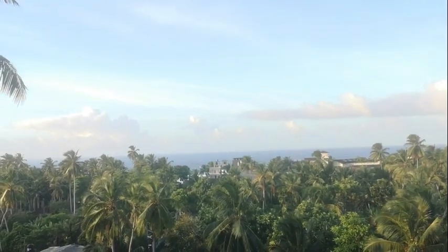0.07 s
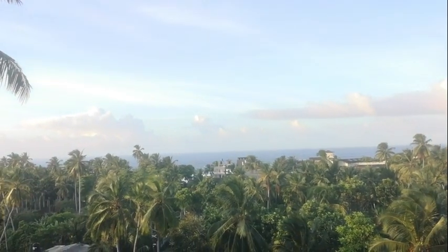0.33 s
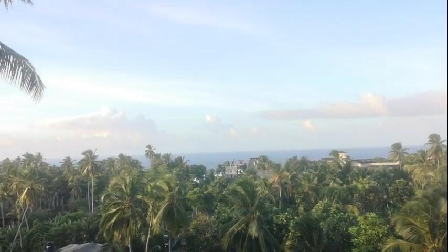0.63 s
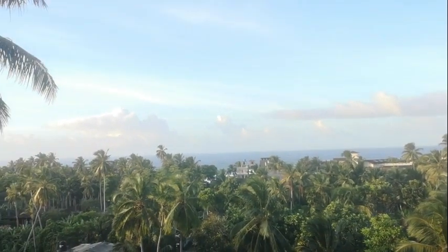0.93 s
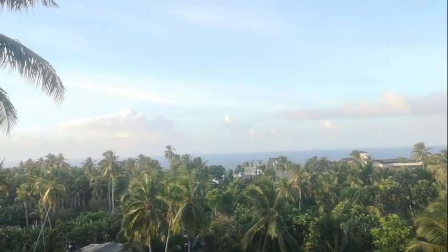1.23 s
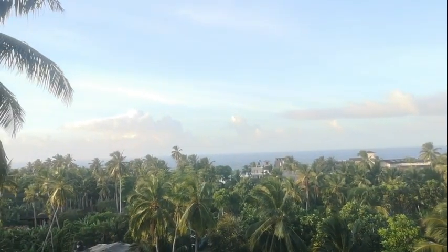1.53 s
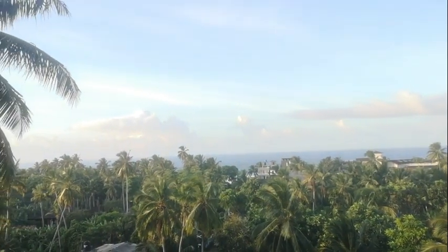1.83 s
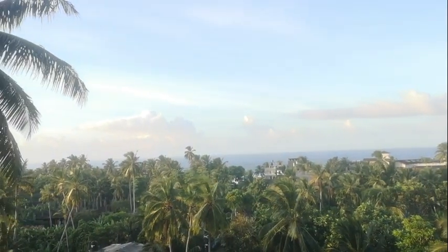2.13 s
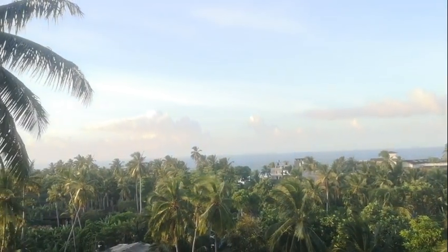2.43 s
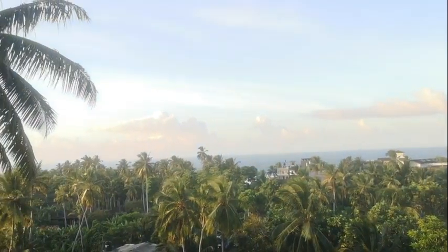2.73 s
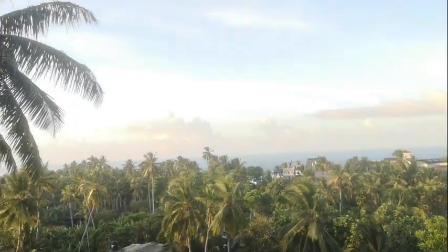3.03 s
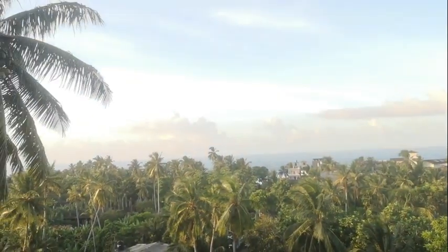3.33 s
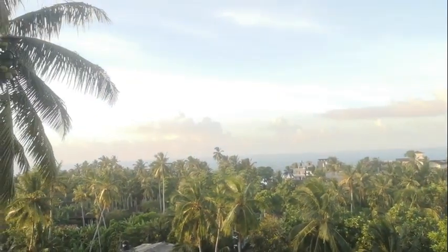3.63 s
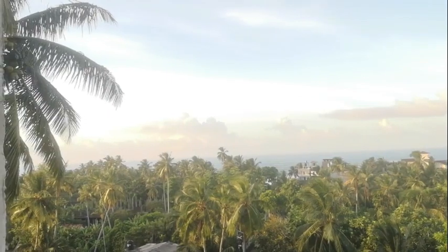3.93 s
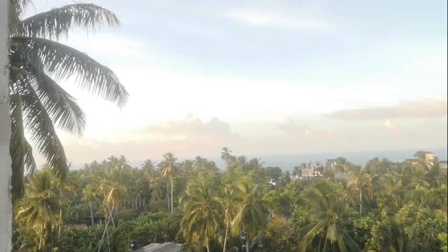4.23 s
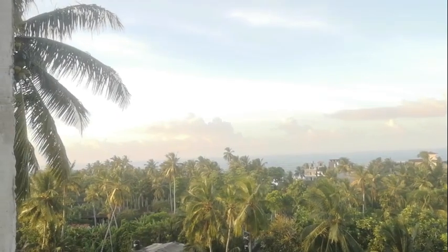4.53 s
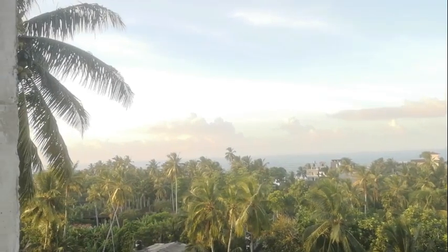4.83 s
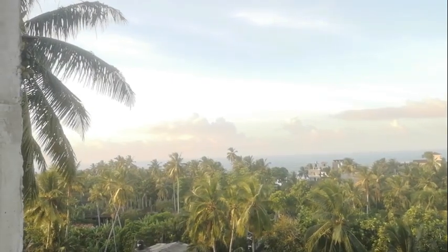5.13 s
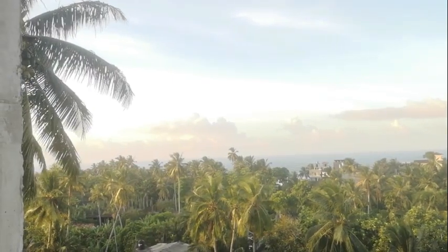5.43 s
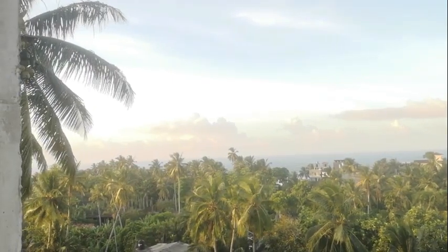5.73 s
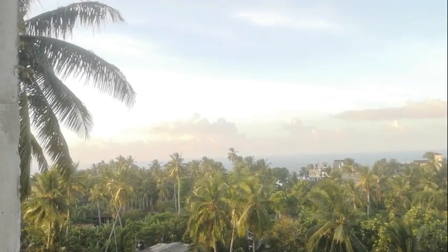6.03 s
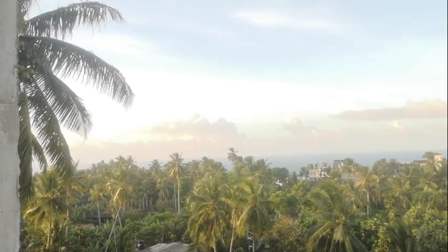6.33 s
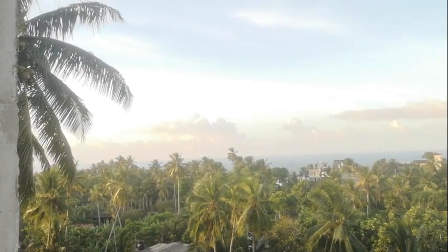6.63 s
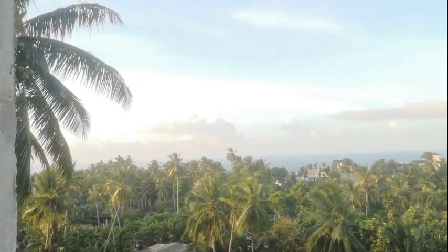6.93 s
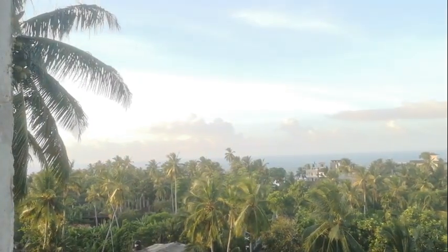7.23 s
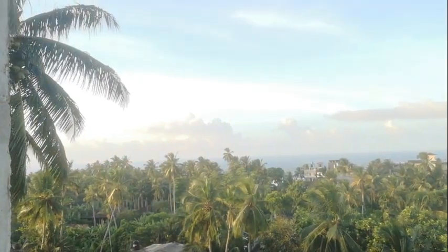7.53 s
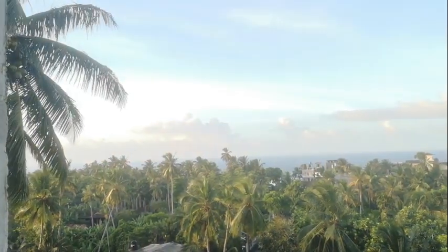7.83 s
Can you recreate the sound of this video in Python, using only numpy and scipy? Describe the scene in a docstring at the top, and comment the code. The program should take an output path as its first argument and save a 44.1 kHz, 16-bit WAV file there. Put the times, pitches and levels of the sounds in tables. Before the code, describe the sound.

Low, gusty wind rumbles on the microphone in a palm grove, over a soft hiss, faint swishing fronds and the hum of a far engine. A small bird starts chipping quietly and steadily on the right. About halfway through, a louder bird gives five raspy falling whistles, then two lower notes that each end in a trill, all with a short echo from the trees. The gusts return, with faint distant peeps.

```python
"""A palm grove, where a bird, likely a kingfisher, calls: five falling whistles, then two lower notes
that each end in a trill. Scattering by the trees gives each note a tail. A small bird chips steadily
nearer by, others peep and chatter far off, and palm fronds swish as their leaflets rub.
Turbulent gusts buffet the microphone over a low rumble, an even hiss and the hum of a far engine."""
import sys
import numpy as np
from scipy import signal
from scipy.fft import rfft, irfft, next_fast_len
from scipy.io import wavfile

SR = 44100
rng = np.random.default_rng(int(sys.argv[2]) if len(sys.argv) > 2 else 0)


def bounce(signal):
    """Save signal as a 16-bit WAV file at the path given by the first command-line argument."""
    frames = np.transpose(np.atleast_2d(signal))
    limited = np.clip(frames, -1, 1)
    pcm = np.round(limited * 32767).astype(np.int16)
    wavfile.write(sys.argv[1], SR, pcm)


N = 351803
TIME = np.arange(N) / SR
SIZE = next_fast_len(N)
BINS = np.fft.rfftfreq(SIZE, 1 / SR)


def gain_of(db):
    """Amplitude ratio of a level in decibels."""
    return 10 ** (np.asarray(db) / 20)


def unit_rms(x):
    """Normalisation to rms 1."""
    return x / np.sqrt(np.mean(x ** 2) + 1e-20)


def spectrum_at(points, hz):
    """Interpolation of a spectrum on a log-frequency axis."""
    f, value = np.transpose(points)
    return np.interp(np.log(hz + 1), np.log(f + 1), value)


def follow(rows, t):
    """Linear interpolation of each column of a curve at the times t."""
    s, *columns = np.transpose(rows)
    return [np.interp(t, s, c) for c in columns]


def add(mix, s, sound):
    """Superposition of a sound on the mix at s seconds."""
    part = mix[max(round(s * SR), 0):][:len(sound)]
    part += sound[:len(part)]


def wander(hz):
    """Random fluctuation of rms 1: noise low-passed near hz."""
    return unit_rms(irfft(rfft(rng.standard_normal(SIZE)) * np.exp(-(BINS / hz) ** 2), SIZE)[:N])


def noise(db, correlation):
    """Partly coherent stereo noise of rms 1, with the spectral shape db."""
    left, independent = rfft(rng.standard_normal((2, SIZE)))
    correlation = np.clip(correlation, -1, 1)
    right = correlation * left + np.sqrt(1 - correlation ** 2) * independent
    return unit_rms(irfft(np.array([left, right]) * gain_of(db), SIZE)[:, :N])


def steadied(x, samples):
    """Division by the running rms removes chance swells longer than the window."""
    window = np.hanning(samples)
    power = signal.fftconvolve((x ** 2).mean(0), window, "same")
    return x / np.sqrt(power / signal.fftconvolve(np.ones(N), window, "same"))


def resampled(x, pace):
    """Time scaling: all frequencies shift in proportion to the pace."""
    at = np.cumsum(pace) % N
    return np.array([np.interp(at, np.arange(N), channel) for channel in x])


def swells(rows):
    """Incoherent Gaussian swells add in power; rows are (peak time [s], half length [s], level [dB])."""
    return sum(gain_of(2 * db) * np.exp(-((TIME - s) / half) ** 2) for s, half, db in rows)


def shaped(shape, start, length, db, ratio=1):
    """A note's contour, stretched and transposed to (time [s], pitch [Hz], level [dB])."""
    return np.array(shape) * [length, ratio, 1] + [start, 0, db]


def sing(notes, quaver, trill_hz, trill_depth, rasp, octave_db=0):
    """Frequency-modulated glides with a weak octave; noise modulation spreads a power share, rasp."""
    # strength of the second harmonic: (frequency [Hz], relative level [dB])
    octave = [(4000, -26), (5400, -24), (6600, -17.5), (7200, -13), (7600, -9.5), (8000, -8), (8400, -18),
              (9000, -30)]
    rasp_hz, trill_fade = 260, 0.42  # the trill dies out over this last share of a note
    out, jitter = np.zeros(N), wander(480)
    frayed = np.sqrt(1 - rasp) + np.sqrt(rasp / 2) * (wander(rasp_hz) + 1j * wander(rasp_hz))
    for rows in notes:
        t = np.arange(rows[0][0], rows[-1][0] + 0.013, 1 / SR)
        hz, db = follow(rows, t)
        fade = np.minimum(np.linspace(1, 0, len(t)) / trill_fade, 1)
        trill = trill_depth * fade * np.sin(2 * np.pi * trill_hz * t)
        hz = hz * (1 + quaver * np.interp(t, TIME, jitter) + trill)
        phasor = np.exp(2j * np.pi * np.cumsum(hz) / SR)
        overtone = gain_of(octave_db + spectrum_at(octave, 2 * hz)) * phasor ** 2
        tone = (np.interp(t, TIME, frayed) * (phasor + overtone)).imag
        add(out, t[0], np.sqrt(2) * gain_of(db) * tone * signal.windows.tukey(len(t), .12))
    return out


def grove(x, early_s, early_db):
    """Reverberation: trunks and crowns scatter sound into a tail; early_db weights its first echoes."""
    # decay by band: (frequency [Hz], time to fall 60 dB [s])
    decay_times = [(1500, 0.32), (2600, 0.58), (4000, 0.35), (8000, 0.44)]
    reflections = rng.standard_normal((2, SR)) * (rng.random((2, SR)) < .1)
    hz, t, bands = signal.stft(reflections, SR, nperseg=256)
    db = early_db * np.exp(-t / early_s) - 60 * t / spectrum_at(decay_times, hz)[:, None]
    tail = signal.istft(bands * gain_of(db), SR, nperseg=256)[1]
    tail /= np.linalg.norm(tail, axis=1, keepdims=True)
    return signal.fftconvolve(x[None], tail, axes=1)[:, :N]


def air():
    """Diffuse field: far surf and foliage sum to an even hiss, coherent only in the bass."""
    # spectrum of the hiss: (frequency [Hz], relative density [dB])
    spectrum = [(100, 12), (250, 14), (350, 7.5), (480, 2), (800, 2), (1100, 3), (1400, -0.5), (1900, 3),
                (2700, 1.5), (4000, -6.5), (8500, -11.5), (9800, -16.5), (11000, -30.5), (15000, -58)]
    # narrow treble humps: (centre [Hz], half width [Hz], height [dB])
    humps = [(5400, 710, 5), (6570, 340, 8.5), (7500, 480, 4.5), (9230, 560, 12.5)]
    # slow drift: (time [s], relative level [dB])
    drift = [(0, -59), (.55, -57.5), (1.1, -58.5), (1.45, -58), (2.2, -58.5), (3.2, -57.5), (3.9, -57),
             (4.7, -56), (5.7, -57.5), (6.3, -58.5), (6.9, -58), (7.98, -57.5)]
    # balance: (frequency [Hz], left minus right [dB])
    balance = [(60, 4), (110, -6.5), (200, 1.5), (380, -0.5), (700, 0.5), (1290, -1.5), (2380, -2.5),
               (4400, 0.5), (8120, -3), (15000, -32.5)]
    # likeness of the channels: (frequency [Hz], correlation [-1 to 1])
    correlation = [(100, 1), (290, 1), (640, -0.26), (1410, 0.26), (3100, -0.19), (6800, -0.0089)]
    db = spectrum_at(spectrum, BINS)
    db += sum(height * np.exp(-((BINS - hz) / width) ** 2) for hz, width, height in humps)
    db = db + spectrum_at(balance, BINS) * np.array([[.5], [-.5]])
    drift_db, = follow(drift, TIME)
    return noise(db, spectrum_at(correlation, BINS)) * gain_of(drift_db + 11.5 + 1.16 * wander(8.9))


def engine():
    """A far engine's periodic motion gives a harmonic hum; its dull roar grows with its speed."""
    # course of the hum: (time [s], fundamental [Hz], relative level [dB])
    running = [(0, 76.9, -40), (2.2, 74.93, -50), (3, 76.34, -45.5), (3.7, 80.7, -43), (5, 81.68, -47.5),
               (5.4, 84.23, -40.5), (5.75, 83.56, -30.5), (6.3, 84.57, -49), (6.75, 84, -34.5),
               (7.3, 83.63, -35.5), (7.98, 83, -43.5)]
    # harmonic series: (order [multiple of the fundamental], relative level [dB])
    harmonics = [(1, 0.5), (2, -10.5), (3, -23), (4, -25), (5, -28.5)]
    # spectrum of the roar: (frequency [Hz], relative density [dB])
    spectrum = [(150, -37), (300, 10), (430, -2), (600, -2), (850, -16), (2000, -37.5)]
    idle_hz, idle_db, growth_db_per_hz = 75.8, -65.5, 1.18
    hz, db = follow(running, TIME)
    phase = 2 * np.pi * np.cumsum(hz * (1 + 0.014 * wander(7.7))) / SR
    hum = sum(gain_of(order_db) * np.sin(order * phase) for order, order_db in harmonics)
    roar = noise(spectrum_at(spectrum, BINS), correlation=0.065)
    roar *= gain_of(idle_db + growth_db_per_hz * (hz - idle_hz))
    return unit_rms(hum) * gain_of(db - 4 + 2 * wander(26)) + roar


def crowns():
    """Flow noise: the breeze soughs through farther palms in soft, mid-pitched swells."""
    # soughs: (peak time [s], half length [s], level [dB])
    soughs = [(.14, 0.13, -54), (.53, 0.11, -52.5), (1.08, 0.11, -55), (3.25, 0.24, -58.5),
              (3.9, 0.14, -52.5)]
    # their spectrum: (frequency [Hz], relative density [dB])
    spectrum = [(500, -20), (1100, 2.5), (1850, 5), (2700, 5.5), (3500, -22), (6000, -31)]
    hiss = noise(spectrum_at(spectrum, BINS), correlation=0)
    return hiss * np.sqrt(swells(soughs)) * gain_of([[-1], [1]])


def fronds():
    """Friction noise: leaflets brush each other in soft, slightly grainy swells."""
    # swishes: (peak time [s], half length [s], level [dB])
    swishes = [(.7, 0.58, -54), (1.14, 0.057, -48.5), (1.74, 0.15, -51.5), (2.33, 0.19, -55),
               (2.76, 0.12, -52.5), (3.15, .2, -58), (3.72, 0.22, -53.5), (4.67, 0.14, -51.5),
               (4.86, 0.079, -53), (5.62, 0.42, -53), (6.11, 0.041, -52), (6.38, .15, -56.5),
               (6.715, 0.099, -53), (6.86, 0.24, -53), (7.457, 0.073, -52.5), (7.64, 0.1, -48.5)]
    # their spectrum: (frequency [Hz], relative density [dB])
    spectrum = [(500, -35), (1500, 11.5), (2800, 11), (4200, 6.5), (5500, 8.5), (7800, 9.5), (9500, 4.5),
                (11000, -6.5), (15000, -12.5)]
    hiss = noise(spectrum_at(spectrum, BINS), correlation=0)
    grain = gain_of(wander(70))
    return hiss * np.sqrt(swells(swishes)) * grain * gain_of([[-1], [1]])


def rustles():
    """Band-limited noise whose centre frequency rises is heard as a soft upward rustle."""
    # sweeps: (start [s], length [s], first centre [Hz], last centre [Hz], level [dB])
    sweeps = [(2.605, 0.12, 2100, 5120, -56), (3.85, .09, 2400, 4800, -56), (4.19, 0.11, 2410, 3450, -53.5)]
    half_width_hz = 1100
    out = np.zeros((2, N))
    for channel in out:
        hiss = wander(half_width_hz) + 1j * wander(half_width_hz)
        for s, length, first_hz, last_hz, db in sweeps:
            hz = np.linspace(first_hz, last_hz, round(length * SR))
            carrier = np.exp(2j * np.pi * np.cumsum(hz) / SR)
            band = (hiss[round(s * SR):][:len(hz)] * carrier).real
            add(channel, s, gain_of(db) * band * signal.windows.tukey(len(hz), .5))
    return out


def wind():
    """Turbulent pressure at the microphone: large eddies push both ports alike, small ones less so."""
    # gusts: (peak time [s], half length [s], large-eddy level [dB], small-eddy level [dB])
    gusts = [(0.017, 0.023, -27.5, -30.5), (0.233, 0.022, -38, -25.5), (0.319, 0.045, -36, -31.5),
             (0.568, 0.029, -26, -48), (0.66, 0.024, -27, -32.5), (0.693, 0.0087, -25, -36),
             (0.783, 0.025, -27.5, -32.5), (0.955, 0.023, -33, -56), (1.822, 0.047, -38, -44),
             (2.355, 0.03, -40, -40.5), (3.978, 0.015, -30, -43), (4.039, 0.0087, -25.5, -29),
             (4.085, 0.014, -23, -26), (4.128, 0.018, -22.5, -28), (4.422, 0.014, -25, -44),
             (4.469, 0.015, -26.5, -52), (4.998, 0.052, -37.5, -58), (5.383, 0.053, -32, -59),
             (5.49, 0.037, -47, -44), (5.676, 0.023, -27.5, -55), (5.778, 0.015, -29, -47),
             (6.141, 0.01, -15, -24), (6.203, 0.029, -23.5, -28.5), (6.253, 0.016, -36, -25),
             (6.323, 0.026, -29, -31.5), (6.407, 0.013, -27, -39), (6.75, 0.024, -24, -52),
             (6.82, 0.011, -26.5, -28), (6.881, 0.014, -22, -20), (7.15, 0.053, -35.5, -39),
             (7.808, 0.02, -36, -46)]
    # breeze between gusts: (time [s], large-eddy level [dB], small-eddy level [dB])
    breeze = [(0, -31.5, -42), (1, -40.5, -46), (1.5, -44.5, -48.5), (2.1, -42, -51.5), (2.6, -44, -50.5),
              (3.7, -45, -50.5), (4.4, -39, -45.5), (4.8, -42.5, -46), (5.5, -37.5, -45), (6.5, -35.5, -40),
              (7, -38.5, -51), (7.98, -38.5, -43.5)]
    # buffeting by large eddies: (frequency [Hz], relative density [dB])
    large_spectrum = [(8, -10.5), (20, 0), (35, -3), (55, -2.5), (90, -7), (125, -14), (180, -28.5),
                      (400, -76)]
    # small eddies: (frequency at pace 1 [Hz], relative density [dB])
    small_spectrum = [(50, -11), (85, -11.5), (110, 1.5), (160, 0), (220, -8), (300, -19), (400, -31),
                      (700, -73), (2000, -79)]
    # pitch drift of the small eddies: (time [s], pace [ratio])
    eddy_pace = [(0, .9), (.25, 0.92), (.57, 0.86), (.8, 0.96), (4.13, 1.075), (4.45, 0.84), (5.5, 1.0),
                 (6.3, .97), (6.88, .7), (7.3, 1.09)]
    flutter_db, left_lag_s = 3, .0006  # the right port feels the wind first
    large_db, small_db = follow(breeze, TIME) + flutter_db * wander(4.5)
    large_power = gain_of(2 * large_db) + swells((s, half, db) for s, half, db, _ in gusts)
    small_power = gain_of(2 * small_db) + swells((s, half, db) for s, half, _, db in gusts)
    large = steadied(noise(spectrum_at(large_spectrum, BINS), correlation=0.982), samples=5000)
    small = steadied(noise(spectrum_at(small_spectrum, BINS), correlation=0.88), samples=3500)
    pace, = follow(eddy_pace, TIME)
    left, right = large * np.sqrt(large_power) + resampled(small, pace) * np.sqrt(small_power)
    left = np.interp(TIME - left_lag_s, TIME, left)
    return np.array([left, right]) * signal.windows.tukey(N, .001)


def chatter():
    """Far birds trade short notes at random, heard only as a reverberant field."""
    # bouts: (peak time [s], half length [s], level [dB])
    bouts = [(1.1, 0.3, -64), (3.5, 0.73, -78), (6.65, 0.24, -57.5), (7.4, 0.51, -62)]
    notes_per_s, note_s = 15, 0.0422
    centre_hz, pitch_spread, glide_spread = 2660, .05, 0.0402
    notes = []
    for s in np.arange(0, TIME[-1] - .3, 1 / notes_per_s):
        late, sharp, glide, db = rng.standard_normal(4)
        start = s + abs(late) / notes_per_s
        hz = centre_hz * (1 + pitch_spread * sharp)
        notes.append([(start, hz, db), (start + note_s, hz * (1 + glide_spread * glide), db - 4)])
    voices = sing(notes, quaver=0.0042, trill_hz=44.9, trill_depth=0.0058, rasp=0.051)
    return unit_rms(grove(voices, early_s=0.048, early_db=-8)) * np.sqrt(swells(bouts))


def peepers():
    """Multipath propagation: thin peeps of small birds arrive both directly and blurred by the trees."""
    # peeps: (start [s], length [s], first pitch [Hz], last pitch [Hz], direct [dB], scattered [dB])
    peeps = [(1.24, 0.056, 3200, 3430, -64, -61), (2.322, 0.038, 4260, 4230, -69, -65),
             (3.39, .12, 6450, 6150, -65, -59), (4.25, .057, 1560, 1425, -59, -55),
             (4.56, 0.071, 5400, 5480, -64, -54), (5.868, 0.027, 4900, 4420, -60, -65),
             (6.43, 0.027, 3550, 3100, -58, -62), (6.437, .018, 5000, 4500, -61, -68),
             (6.64, .04, 2844, 2750, -59, -57), (6.746, 0.032, 3950, 4050, -64, -55),
             (7.39, 0.028, 4000, 3738, -61, -55), (7.62, 0.081, 2740, 2506, -68, -60)]
    direct = [[(s, first, db), (s + length, last, db)] for s, length, first, last, db, _ in peeps]
    scattered = [[(s, first, db), (s + length, last, db)] for s, length, first, last, _, db in peeps]
    timbre = dict(quaver=.008, trill_hz=61, trill_depth=.008, rasp=.4)
    return sing(direct, **timbre) + grove(sing(scattered, **timbre), early_s=0.032, early_db=10)


def chipper():
    """Early reflections off nearby walls follow the down-slurred chips of a small bird on the right."""
    # chips: (time [s], peak level before panning [dB], pitch [Hz])
    chips = [(1.563, -56, 5084), (1.791, -55, 5100), (2.048, -54, 5120), (2.335, -53, 5093),
             (2.757, -54, 5090), (3.038, -52.5, 5040), (3.317, -56, 5035), (3.571, -55, 5120),
             (3.908, -51.5, 5050), (4.118, -49.5, 5110), (4.459, -53, 5070), (4.741, -52, 5020),
             (4.993, -52.5, 5080), (5.208, -46.5, 5073), (5.435, -46.5, 5180), (5.688, -50, 5130),
             (6.107, -52.5, 5100), (6.306, -56, 5200), (6.53, -54, 5200), (6.72, -55, 4946),
             (6.819, -55, 5170), (7.092, -58, 5183), (7.382, -56, 5060), (7.626, -50, 5207),
             (7.874, -53.5, 5100)]
    # direction of the bird: (time [s], left minus right [dB])
    pan = [(1.6, -9), (3.3, -13), (4.1, -22.5), (5.4, -16), (6.7, -12)]
    # wall reflections: (nominal delay [s], relative level [dB])
    walls = [(.012, -4), (.026, -12)]
    # changing strength of all reflections: (time [s], added level [dB])
    echo_level = [(3, -3), (5.5, -5), (6.3, -3), (7.2, 1)]
    chip_s, fall_share = 0.02, 0.065
    direct, echoes = np.zeros((2, N)), np.zeros((2, N))
    progress = np.linspace(0, 1, round(chip_s * SR))
    for s, db, hz in chips:
        phase = 2 * np.pi * np.cumsum(hz * (1 + fall_share * (.5 - progress))) / SR
        chip = gain_of(db) * np.sin(np.pi * progress) * np.sin(phase)
        pan_db, = follow(pan, s)
        echo_db, = follow(echo_level, s)
        for channel, side in enumerate((.5, -.5)):
            panned = gain_of(side * pan_db) * chip
            add(direct[channel], s, panned)
            for delay_s, wall_db in walls:
                arrival = s + delay_s * rng.uniform(0.67, 1.8)
                add(echoes[channel], arrival, gain_of(wall_db + echo_db) * panned)
    tail = gain_of(-0.5) * grove(echoes.mean(0), early_s=.04, early_db=9)
    return direct + echoes + tail


def whistle(start, length, db, ratio, end_db, octave_db):
    """A raspy downward frequency sweep; end_db raises or lowers its ending."""
    # swell and dive: (position [share of length], pitch at ratio 1 [Hz], relative level [dB])
    contour = [(0, 4450, -20), (.13, 4096, -14), (.26, 3787, -7), (.35, 3360, -6.5), (0.441, 2875, -3),
               (.55, 2567, -2.6), (.72, 2168, -17.5), (1, 1989, -11)]
    second_half = np.clip(2 * np.array(contour)[:, 0] - 1, 0, 1)
    points = shaped(contour, start, length, db, ratio)
    points[:, 2] += end_db * second_half
    return sing([points], quaver=.011, trill_hz=130, trill_depth=.021, rasp=.5, octave_db=octave_db)


def kingfisher():
    """Multiple scattering: the loud bird is hidden in the crowns, so all its call arrives indirectly."""
    # whistles: (start [s], length [s], level [dB], pitch [ratio], ending lift [dB], octave lift [dB])
    whistles = [(4.25, 0.17, -29.5, 1.003, -0.5, -3), (4.53, .17, -28.5, 1.02, -1, -1.5),
                (4.815, 0.2, -28.5, 0.99, 1.5, 2), (5.121, .195, -29, 1.005, -4, 0),
                (5.426, .2, -29.8, .99, 3, -3)]
    # lower, cleaner notes: (start [s], length [s], level [dB])
    low_notes = [(5.783, .115, -39), (6.103, 0.1, -41.5)]
    # each drops, then levels off: (position [share of length], pitch [Hz], relative level [dB])
    low_contour = [(0, 3576, -14), (.14, 3503, -3), (.22, 3056, -0.5), (.38, 2762, -2), (.7, 2700, 1.5),
                   (1, 2610, -7)]
    # trills: (start [s], length [s], level [dB], pitch [ratio])
    trills = [(5.868, .22, -31, 1.0), (6.216, 0.17, -45, 1.1)]
    # each rises and sags: (position [share of length], pitch at ratio 1 [Hz], relative level [dB])
    trill_contour = [(0, 1862, -4), (.22, 1946, -5.5), (.55, 1996, -4), (.76, 1790, -7), (.88, 1630, -14),
                     (1, 1620, -6.5)]
    voice = sum(whistle(*row) for row in whistles)
    voice += sing([shaped(low_contour, *row) for row in low_notes],
                  quaver=.007, trill_hz=130, trill_depth=.01, rasp=.2, octave_db=3)
    voice += sing([shaped(trill_contour, *row) for row in trills],
                  quaver=.012, trill_hz=98.6, trill_depth=.125, rasp=.12)
    return grove(voice, early_s=0.029, early_db=-8) * gain_of([[-1.1], [.7]])


def scene():
    """Linear superposition of all sources at the two microphone ports."""
    birds = kingfisher() + chipper() + peepers() + chatter()
    return birds + wind() + engine() + air() + fronds() + rustles() + crowns()


def record(dry):
    """Band limiting: the recorder's steep low-pass filter removes the highest treble."""
    cutoff_hz = 15200
    lowpass = signal.firwin(511, cutoff_hz, window=("kaiser", 9), fs=SR)
    return signal.oaconvolve(dry, lowpass[None], "same")


dry = scene()
out = record(dry)
bounce(out)
```